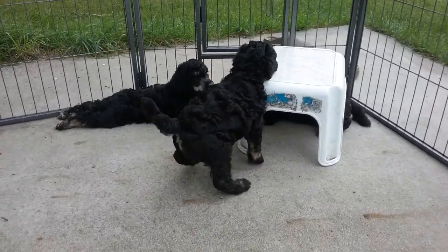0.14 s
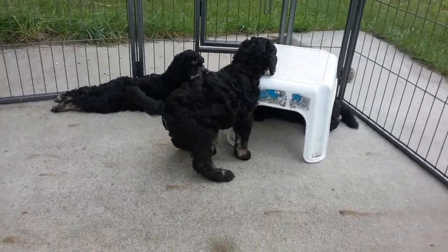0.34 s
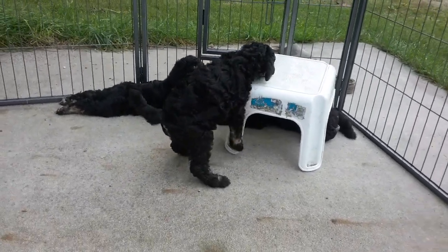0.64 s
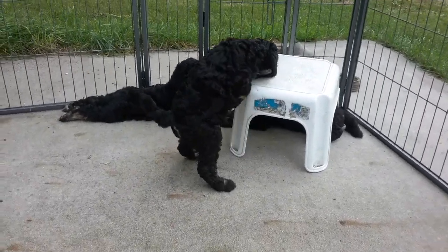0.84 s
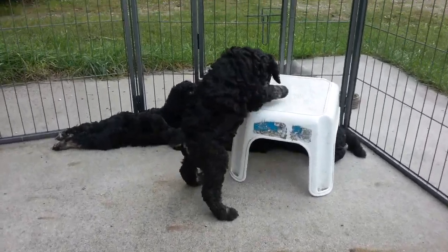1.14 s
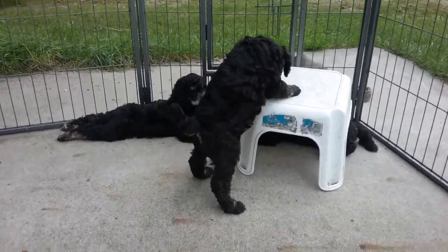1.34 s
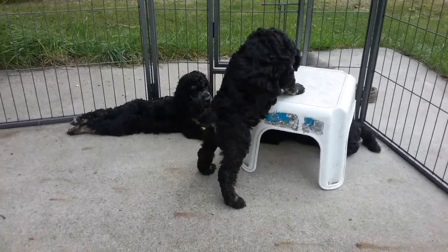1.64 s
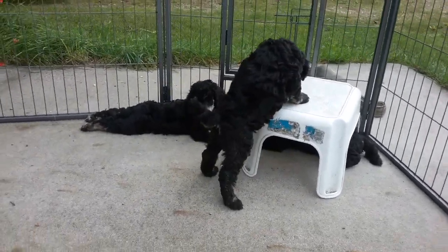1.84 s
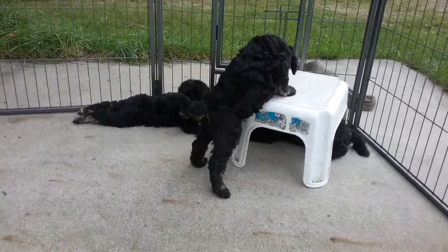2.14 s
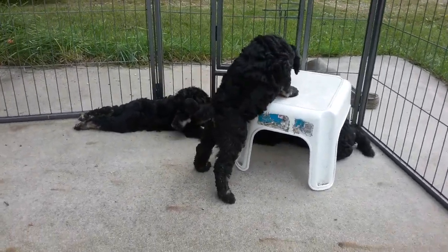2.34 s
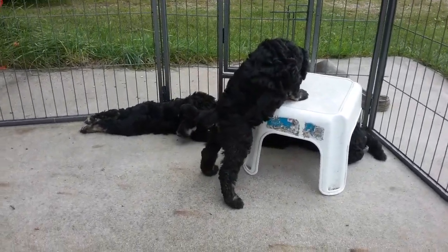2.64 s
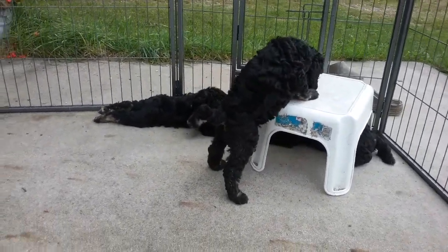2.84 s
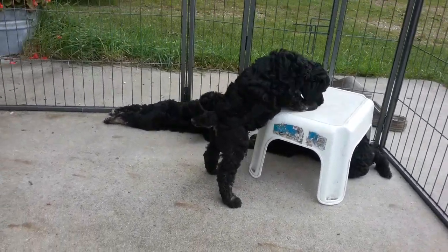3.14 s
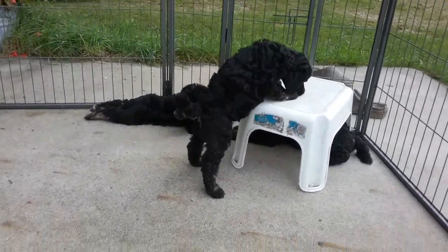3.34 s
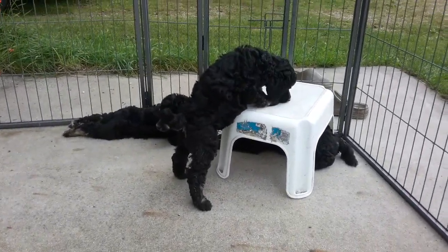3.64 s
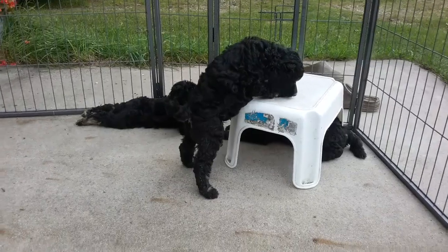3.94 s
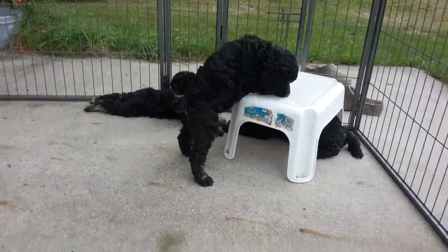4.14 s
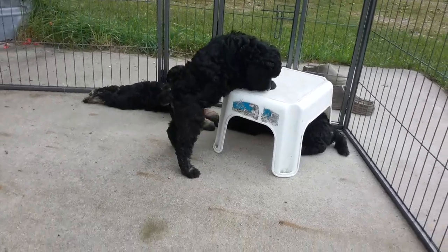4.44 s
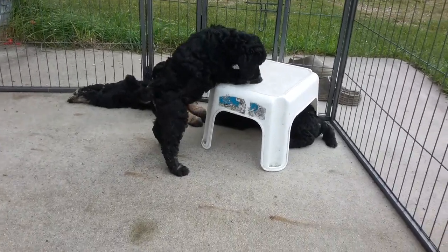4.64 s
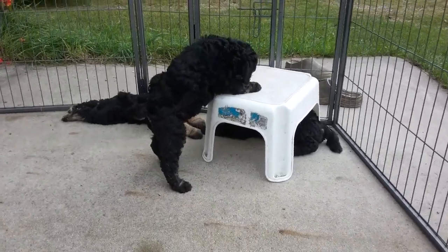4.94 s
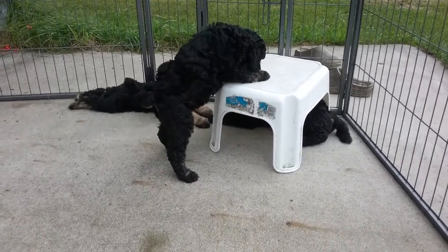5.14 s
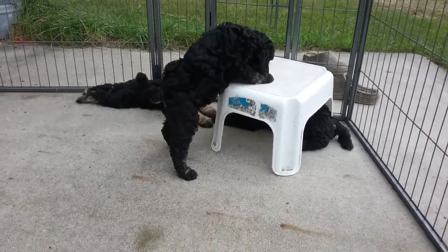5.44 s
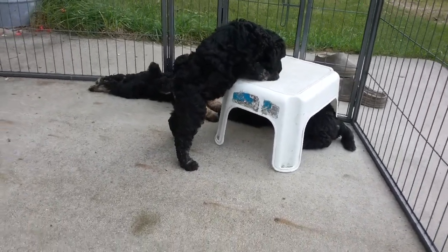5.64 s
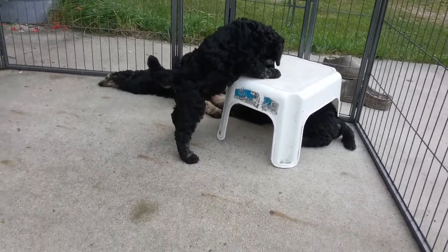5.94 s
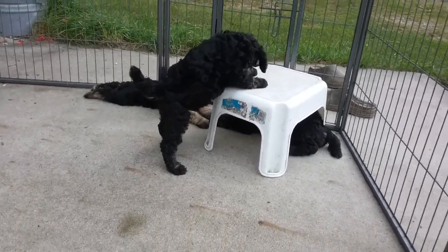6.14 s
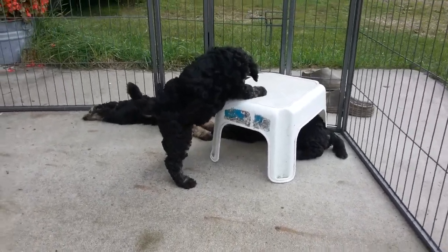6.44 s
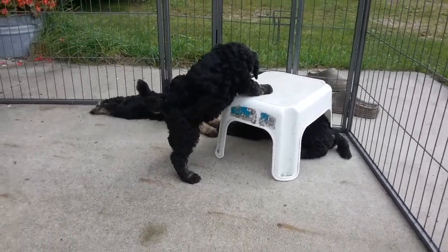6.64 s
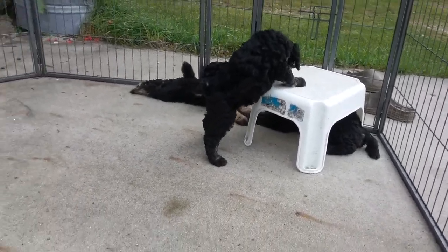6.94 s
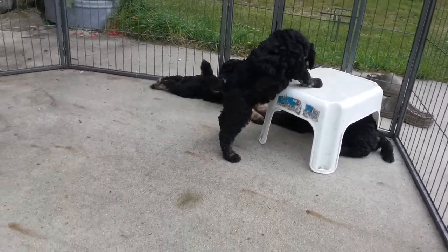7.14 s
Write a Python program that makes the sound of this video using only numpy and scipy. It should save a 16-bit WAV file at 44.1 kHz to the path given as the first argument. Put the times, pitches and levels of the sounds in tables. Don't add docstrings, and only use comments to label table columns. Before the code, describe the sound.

Irregular hollow plastic thuds, claw ticks and short scuffing scrapes from a puppy on a step stool outdoors, faint distant bird twitter behind.

```python
import sys
import numpy as np
from scipy import signal
from scipy.fft import rfft, irfft
from scipy.io import wavfile
from scipy.ndimage import uniform_filter1d

SR = 44100
rng = np.random.default_rng(int(sys.argv[2]) if len(sys.argv) > 2 else 0)


def pcm_store(signal):
    levels = np.round(np.clip(np.atleast_2d(signal), -1, 1) * 32767)
    wavfile.write(sys.argv[1], SR, levels.astype(np.int16).T)


def natural_amplitude(level_db):
    exponent = np.asarray(level_db, float) / 20
    return 10 ** exponent


N = 321048


def colour(x, points):
    hz, db = np.transpose(points)
    f = np.maximum(np.arange(len(x) // 2 + 1) * SR / len(x), 1)
    gain = natural_amplitude(np.interp(np.log(f), np.log(hz), db))
    return irfft(rfft(x) * gain, len(x))


def band(x, lo_hz, hi_hz):
    sos = signal.butter(3, [lo_hz, hi_hz], "bandpass", fs=SR, output="sos")
    y = signal.sosfilt(sos, x)
    return y / np.sqrt(np.mean(y ** 2))


def walk(rate):
    hold = int(SR / rate)
    steps = np.repeat(rng.standard_normal(N // hold + 1), hold)
    smooth = uniform_filter1d(uniform_filter1d(steps, hold), hold)
    return 1.22 * smooth[:N]


def add(out, s, x):
    i = int(s * SR)
    out[i:i + len(x)] += x[:max(len(out) - i, 0)]


def ring(modes, gains, t60, t):
    hz, db, share = np.transpose(modes)[:, :, None]
    decay = np.exp(-np.log(1000) * t / (t60 * share))
    return np.sum(gains[:, None] * natural_amplitude(db) * decay * np.sin(2 * np.pi * hz * t), axis=0)


def grit(rate, spread_db):
    clicks = rng.random(N) < rate / SR
    height = natural_amplitude(spread_db * np.minimum(rng.exponential(size=N), 2))
    return rng.standard_normal(N) * (1 + 4 * clicks * height)


# (frequency [Hz], level [dB per Hz])
AIR = [(15, -42), (25, 8), (33, -9), (80, 3), (123, -20), (1020, 1.5), (1790, -11), (1940, -14), (2840, -5),
       (3160, -7.5), (4140, -6), (5140, -8.5), (7110, -1), (8830, -14), (16000, -12)]


def air():
    x = colour(rng.standard_normal(N), AIR)
    return x / x.std() * natural_amplitude(-72 + 0.2 * walk(2.73))


# (frequency [Hz], level [dB], share of the ring time [1])
SHELL = [(146.8, -5.5, 0.92), (178, -3.5, 1.15), (210.2, 2, 0.86), (246.1, 3.5, 0.84), (283, 3.5, 0.77),
         (310, -1, 0.73), (336.5, 2, 0.62), (374.4, -4, 0.57), (433, -4.5, 0.62)]
# (frequency [Hz], level [dB], share of the ring time [1])
PANEL = [(472, 1.5, 0.57), (537, 4, .5), (612, 4, 0.41), (678.6, 5.5, 0.39), (758, -2.5, 0.6),
         (882, -4.5, 0.17), (1014, -10.5, 0.28), (1106, -3, .35)]
# (frequency [Hz], level [dB], share of the ring time [1])
LEGS = [(74.7, -6, 1.44), (94.5, -2, 1.7), (123.8, -0.5, 1.33)]
# (frequency [Hz], level [dB per Hz])
SCRATCH = [(240, -18), (400, 1), (626, -3.5), (666, 0.5), (765, -2), (865, 0.5), (1010, -3), (1630, -9.5),
           (1990, -10), (2180, -9.5), (2550, -11), (4880, -24), (6340, -17), (9040, -44), (16000, -37)]
# (time [s], shell rumble [dB], pad scrape [dB], claw scratch [dB], fur hiss [dB])
RUBBING = [(0.0, -79, -74, -79, -81), (0.14, -69, -80, -77, -84), (0.3, -58, -77, -73, -73.5),
           (0.45, -55.5, -59.5, -72.5, -75), (0.55, -67, -71, -59.5, -59.5), (0.67, -57, -59, -60, -63),
           (0.71, -46.5, -52.5, -61.5, -68), (0.81, -56, -53.5, -54, -55),
           (0.85, -58.5, -59.5, -66.5, -69.5), (1.07, -56.5, -59.5, -70, -71), (1.19, -46, -56, -62.5, -64),
           (1.3, -81, -64, -69, -70), (1.38, -53, -58.5, -66.5, -68.5), (1.46, -48, -51.5, -61.5, -69),
           (1.54, -70, -79, -78.5, -87), (1.64, -71, -74, -80, -111), (1.97, -62.5, -69, -72, -71),
           (2.13, -72, -69, -67, -67.5), (2.27, -80.5, -88, -80, -83), (2.55, -77, -83.5, -81, -76.5),
           (2.74, -78, -75, -71, -75), (2.86, -54, -78, -72, -72.5), (2.88, -43.5, -75, -60, -60),
           (2.98, -59, -70, -74, -73), (3.1, -59.5, -69, -70.5, -68), (3.33, -65.5, -76, -67, -71),
           (3.49, -65.5, -65, -73.5, -76), (3.57, -69, -68, -74, -80), (3.67, -70, -76, -75.5, -76),
           (3.81, -60.5, -68, -80.5, -78), (4.05, -65, -56.5, -61, -67.5), (4.18, -52.5, -53.5, -68, -72),
           (4.38, -54, -62, -58, -60), (4.5, -53, -53, -60, -63), (4.58, -57, -49.5, -53, -59.5),
           (4.7, -55, -60, -68.5, -67), (4.83, -73.5, -73.5, -76, -73.5), (5.05, -50, -55, -66.5, -80),
           (5.19, -66, -73, -69.5, -68), (5.33, -73, -81, -70.5, -69), (5.47, -45.5, -82, -75, -73),
           (5.54, -48.5, -56.5, -56, -57), (5.72, -51.5, -54.5, -64.5, -66), (5.8, -43, -51, -65, -70.5),
           (5.86, -58.5, -51, -64, -69.5), (6.12, -60, -71, -70, -66.5), (6.2, -57.5, -68, -68, -74),
           (6.32, -63, -71, -74.5, -76), (6.67, -62, -66.5, -72, -75), (6.81, -67.5, -70, -72.5, -80),
           (7.06, -77, -75, -82, -97), (7.12, -58, -63, -66, -65), (7.2, -60, -63.5, -70.5, -69.5),
           (7.28, -70, -61, -67, -71)]


def rubbing():
    s, *columns = np.transpose(RUBBING)
    shell_db, pad_db, claw_db, fur_db = (np.interp(np.arange(N) / SR, s, c) for c in columns)
    t = np.arange(SR // 4) / SR
    slip = walk(30)
    body = [*SHELL, *LEGS]
    judder = signal.fftconvolve(grit(60, 5.8), ring(body, np.ones(len(body)), 0.13, t))[:N]
    skid = colour(grit(500, 1.66), SCRATCH)
    panel_ring = ring(PANEL, np.ones(len(PANEL)), 0.13, t)
    driven = signal.fftconvolve(grit(150, 5.0), panel_ring)[:N]
    panel = band(skid, 430, 1434) + 0.47 * band(driven, 433, 1500)

    rumble = natural_amplitude(shell_db + 2.56 * walk(24.99)) * band(judder, 64, 540)
    scrape = natural_amplitude(pad_db - 2 + 2.2 * slip + 1.5 * walk(60)) * panel
    scratch = natural_amplitude(claw_db + 2.73 * slip + 1.5 * walk(60)) * band(skid, 1360, 4410)
    hiss = natural_amplitude(fur_db + 2.4 * slip + 1.8 * walk(40)) * band(skid, 4050, 8200)
    top_hiss = natural_amplitude(fur_db - 14) * band(skid, 8560, 15500)
    return rumble + scrape + scratch + hiss + top_hiss


# (time [s], peak level [dB], favoured pitch [Hz], ring t60 [s],
# panel modes re shell [dB], rocking on the legs re shell [dB])
BLOWS = [(0.052, -50.5, 310, 0.23, -9.5, -13), (0.168, -27.5, 430, 0.13, -6.5, -13),
         (0.356, -33.5, 160, 0.14, -23, -16), (0.495, -29.5, 230, 0.12, -2.5, -13),
         (0.515, -28.5, 426, 0.086, -3, -17), (0.549, -32.5, 225, 0.11, -0.5, -11),
         (0.627, -17.5, 178, 0.14, -27, -17), (0.7, -30.5, 278, 0.11, -22, -19),
         (0.786, -30.5, 270, 0.14, -18, -13), (1.227, -26, 275, 0.09, -31, -9.5),
         (1.273, -18, 177, 0.095, -17, -16), (1.32, -34.5, 160, 0.083, -11, -11),
         (1.581, -31.5, 207, 0.1, -9, -18), (1.871, -53, 188, 0.16, -8, -14),
         (1.909, -40.5, 80.7, 0.37, -15, -6), (1.931, -26, 202, 0.15, -13.5, -20),
         (1.998, -42.5, 163, 0.16, -31, -14), (2.7, -21, 318, 0.11, -16, -19.5),
         (2.779, -29.5, 258, 0.091, -28, -18), (2.866, -25.5, 285, 0.13, -17, -23),
         (2.932, -24.5, 182, 0.098, -26, -12), (2.964, -40.5, 111, 0.14, -25, -4),
         (3.076, -37.5, 269, 0.14, -21, -8), (3.131, -32.5, 178, 0.11, -17, -11),
         (3.301, -25.5, 250, 0.12, -7, -21), (3.461, -29.5, 248, 0.13, -14, -16.5),
         (3.52, -37.5, 264, 0.091, -26, -7), (3.625, -41.5, 324, 0.14, -15, -6),
         (3.744, -24.5, 139, 0.18, -13.5, -15), (3.999, -37.5, 200, 0.21, -3, -16),
         (4.065, -30, 320, 0.14, -7, -14), (4.213, -40, 283, 0.11, -7, -1),
         (4.243, -19.5, 192, 0.11, -17.5, -16), (4.576, -40, 334, 0.31, -2, -24),
         (4.779, -52, 198, 0.12, -16, -27), (4.922, -49.5, 188, 0.18, -11, -18),
         (5.215, -39.5, 260, 0.11, -1, -22), (5.316, -20, 190, 0.096, -6.5, -21),
         (5.389, -17, 354, 0.11, -19, -22.5), (5.486, -26, 189, 0.12, -13, -13),
         (5.622, -22.5, 88, 0.12, -7.5, -6), (5.969, -46, 234, 0.11, 8, -8),
         (6.006, -36, 139, 0.16, -6, -18), (6.133, -32.5, 187, 0.14, -9.5, -10.5),
         (6.32, -31, 143, 0.13, -17, -10.5), (6.484, -45, 245, 0.14, -25, -13),
         (6.761, -43, 338, 0.12, -4.5, -11), (7.018, -31.5, 210, 0.13, -31, -15),
         (7.061, -39, 151, 0.2, -10, -22), (7.216, -40, 297, 0.2, -12, -19),
         (7.248, -45, 222, 0.16, -18, -17)]


def blows():
    out = np.zeros(N)
    t = np.arange(SR // 3) / SR
    shell_hz = np.array(SHELL)[:, 0]
    for s, db, hz, t60, panel_db, legs_db in BLOWS:
        push = np.zeros(SR // 8)
        when = np.cumsum(0.003 + 0.006 * np.abs(rng.standard_normal(4))) - 0.003
        at = np.clip(when * SR, 0, len(push) - 1).astype(int)
        bounce_db = 2.7 * rng.standard_normal(4) - 3.62 * np.arange(4)
        push[at] = natural_amplitude(bounce_db) * np.sign(rng.standard_normal(4))

        near = np.exp(-0.5 * (np.log2(shell_hz / hz) / 0.3) ** 2) + 0.21
        shell_gains = near * natural_amplitude(2.63 * rng.standard_normal(len(SHELL)))
        panel_gains = natural_amplitude(3.7 * rng.standard_normal(len(PANEL)))
        legs_gains = natural_amplitude(2.3 * rng.standard_normal(len(LEGS)))
        # modes, gains, peak level in dB, build-up time in s
        parts = ((SHELL, shell_gains, db, 0.005),
                 (PANEL, panel_gains, db + panel_db - 1, 0.001),
                 (LEGS, legs_gains, db + legs_db, 0.012))
        for modes, gains, level_db, rise in parts:
            response = ring(modes, gains, max(t60, 0.02), t) * (1 - np.exp(-t / rise))
            wave = signal.fftconvolve(response, push)
            add(out, s - 0.005, natural_amplitude(level_db) * wave / np.abs(wave).max())
    return out


# (time [s], peak level [dB], dull part [dB], bright part [dB],
# skid t60 [s], pitch of the struck rib [Hz])
CLAWS = [(0.0503, -51.5, -48.5, -70, 0.05, 1140), (0.1585, -36.5, -44.5, -40, 0.057, 1990),
         (0.3586, -52.5, -50.5, -54, 0.08, 955), (0.5073, -43, -36.5, -54, 0.076, 1470),
         (0.5487, -37.5, -49, -49, 0.077, 1470), (0.6225, -46, -39.5, -54, 0.11, 1010),
         (0.729, -46, -57, -52, 0.12, 1950), (0.7525, -41.5, -53, -39.5, 0.082, 3340),
         (1.0364, -54, -60, -50, 0.15, 980), (1.1757, -47, -50, -54, 0.055, 977),
         (1.2251, -53.5, -55, -56, 0.091, 1040), (1.3028, -44.5, -44.5, -53.5, 0.13, 935),
         (1.419, -48.5, -54, -67, 0.08, 1510), (1.759, -61, -61, -72, 0.095, 1340),
         (1.934, -55, -51, -67, 0.13, 915), (1.9704, -53, -61, -53.5, 0.14, 947),
         (2.6936, -39.5, -40.5, -42, 0.051, 960), (2.7794, -57, -46, -62, 0.08, 1130),
         (2.8659, -34.5, -27, -46, 0.046, 920), (2.9318, -56, -44, -58, 0.08, 940),
         (3.0724, -39, -47, -48.5, 0.11, 1220), (3.1182, -35, -39.5, -44.5, 0.06, 1010),
         (3.2006, -51, -65, -49.5, 0.11, 1660), (3.268, -51, -45, -63, 0.084, 980),
         (3.3013, -34.5, -29, -46.5, 0.055, 1140), (3.46, -55.5, -47.5, -59, 0.1, 904),
         (3.5147, -47.5, -54, -59, 0.07, 1396), (3.7449, -45.5, -41, -52.5, 0.11, 1120),
         (3.985, -49, -51.5, -52, 0.11, 1250), (4.0418, -41, -42.5, -65, 0.08, 1145),
         (4.0737, -47, -45, -60, 0.072, 923), (4.1494, -55, -53.5, -52, 0.089, 920),
         (4.351, -49, -55, -49, 0.23, 885), (4.573, -49, -47, -59, 0.1, 1170),
         (4.7354, -69, -72, -58, 0.058, 1090), (4.952, -64, -49.5, -76, 0.16, 1090),
         (5.0214, -50.5, -57, -54.5, 0.096, 940), (5.1138, -53, -49, -68, 0.16, 1004),
         (5.215, -41.5, -44.5, -51.5, 0.12, 1080), (5.3126, -41, -31.5, -47.5, 0.051, 895),
         (5.3813, -29.5, -30, -36.5, 0.058, 1580), (5.481, -47.5, -45, -58, 0.087, 1280),
         (5.493, -42, -49, -46, 0.073, 1130), (5.6083, -31.5, -37, -40.5, 0.096, 1310),
         (5.7423, -58, -58, -64, 0.08, 1060), (5.9144, -54.5, -62, -52, 0.097, 1110),
         (5.9736, -45.5, -43, -48.5, 0.16, 890), (6.129, -54, -48.5, -71, 0.099, 910),
         (6.2194, -66, -68, -55, 0.057, 940), (6.3139, -50, -50.5, -56, 0.084, 980),
         (6.576, -49, -57, -68, 0.083, 1210), (7.0598, -46, -49.5, -50.5, 0.098, 900),
         (7.1357, -50.5, -50, -55.5, 0.14, 950), (7.2294, -64, -55.5, -55, 0.062, 912)]


def claws():
    out = np.zeros(N)
    t = np.arange(SR // 4) / SR
    skid = colour(grit(900, 2.17), SCRATCH)
    middle, dull = band(skid, 1390, 3920), band(skid, 450, 1300)
    bright, top = band(skid, 4260, 8500), band(skid, 7900, 15500)
    onset = 1 - np.exp(-t / 0.00099)
    for s, db, dull_db, bright_db, t60, hz in CLAWS:
        i = int((s - 0.001) * SR)
        rib_modes = [(hz, 0, 1.0), (0.54 * hz, -3, 1.2), (1.42 * hz, -4, 0.8), (1.9 * hz, -6, 0.6)]
        ribs = ring(rib_modes, natural_amplitude(5.3 * rng.standard_normal(4)), 0.044, t[:2000])
        # noise, level in dB, stretch of the decay, share of rib ringing
        parts = ((middle, db - 5, 1.19, 0.39), (dull, dull_db - 1.5, 1.18, 0.29),
                 (bright, bright_db - 5, 1.37, 0), (top, bright_db - 17, 0.59, 0))
        for layer, level_db, stretch, ringing in parts:
            piece = layer[i:i + len(t)]
            rung = signal.fftconvolve(piece, ribs)[:len(piece)]
            piece = piece + ringing * band(rung, 450, 6000)
            shape = onset * np.exp(-np.log(1000) * t / (max(t60, 0.01) * stretch))
            add(out, (i + 0.1) / SR, natural_amplitude(level_db) * piece * shape[:len(piece)])
    return out


# (time [s], length [s], start frequency [Hz], end frequency [Hz], level [dB])
CHIRPS = [(.338, .03, 5600, 6700, -54), (.355, .12, 6600, 6500, -62), (1.98, .08, 8150, 8150, -76),
          (4.42, .11, 8150, 8150, -76), (.05, .11, 4750, 4800, -71), (.2, .12, 5200, 4800, -74),
          (1.5, .12, 4900, 4750, -73), (3.3, .12, 5000, 5200, -72), (5.4, .08, 5300, 5200, -72),
          (5.81, .05, 4800, 4750, -70), (5.95, .06, 5300, 5200, -68), (6.27, .07, 5250, 5250, -71),
          (6.48, .14, 5100, 5350, -71), (6.85, .1, 4900, 4700, -74)]


def chirps():
    out = np.zeros(N)
    for s, length, from_hz, to_hz, db in CHIRPS:
        n = int(length * SR)
        flutter = band(rng.standard_normal(8000), 14, 260)[-n:]
        phase = 2 * np.pi * np.cumsum(np.linspace(from_hz, to_hz, n)) / SR
        add(out, s, natural_amplitude(db + 1.5) * np.hanning(n) ** 0.5 * flutter * np.sin(phase))
    return out


def scene():
    stool = rubbing() + blows() + claws()
    t = np.arange(SR // 5) / SR
    scatter = rng.standard_normal(len(t)) * np.exp(-np.log(1000) * t / 0.19) * (t > 0.004)
    scatter = scatter / np.sqrt(np.sum(scatter ** 2))
    wet = signal.fftconvolve(stool, scatter)[:N]
    return (stool + natural_amplitude(-13.5) * wet + chirps() + air())[None]


def band_limit(x):
    return signal.sosfilt(signal.butter(12, 16380, fs=SR, output="sos"), x)


def record(dry):
    bass_cut = signal.butter(5, 62, "highpass", fs=SR, output="sos")
    top_cut = signal.ellip(10, 0.2, 60, 15760, fs=SR, output="sos")
    mix = signal.sosfilt(top_cut, signal.sosfilt(bass_cut, dry)) - 0.0005
    return band_limit(mix)


dry = scene()
out = record(dry)
pcm_store(out)
```